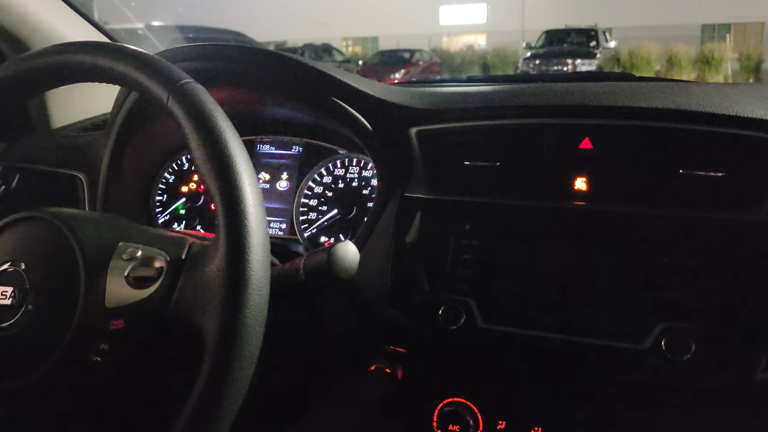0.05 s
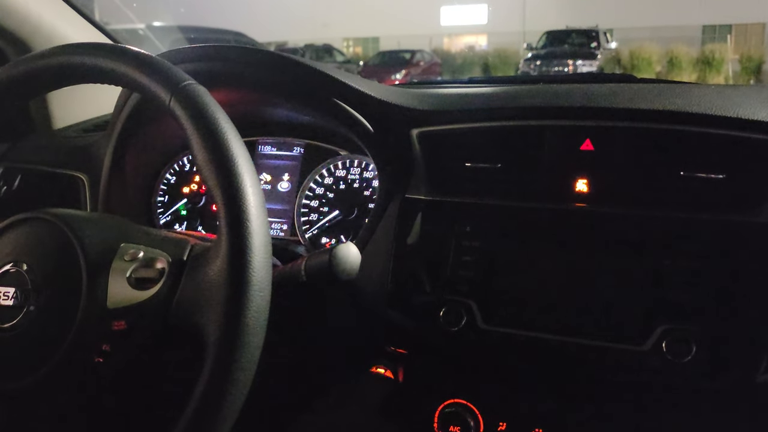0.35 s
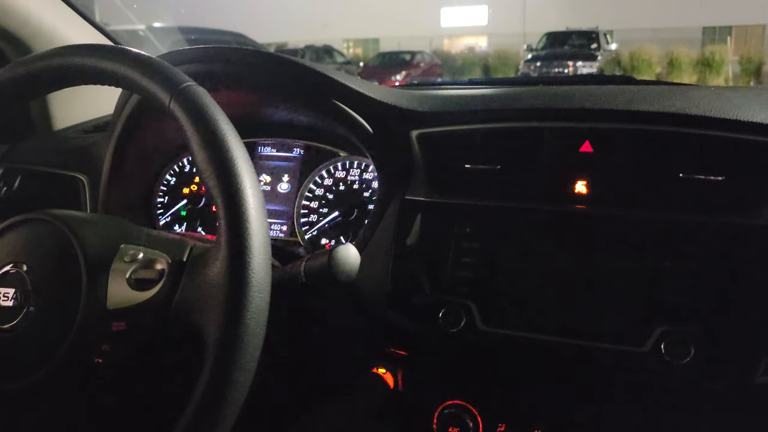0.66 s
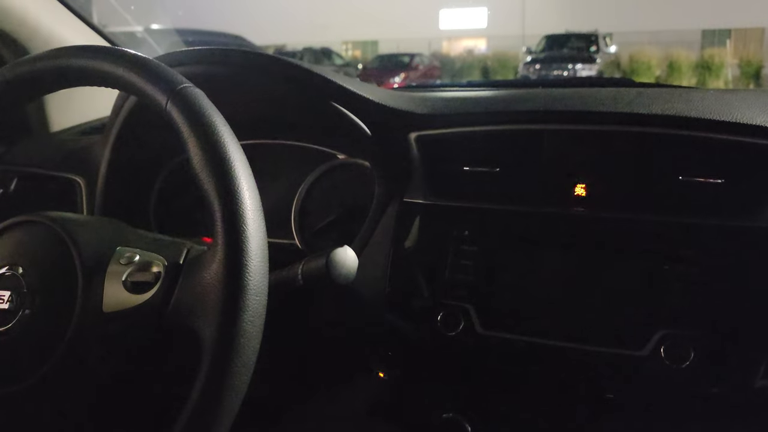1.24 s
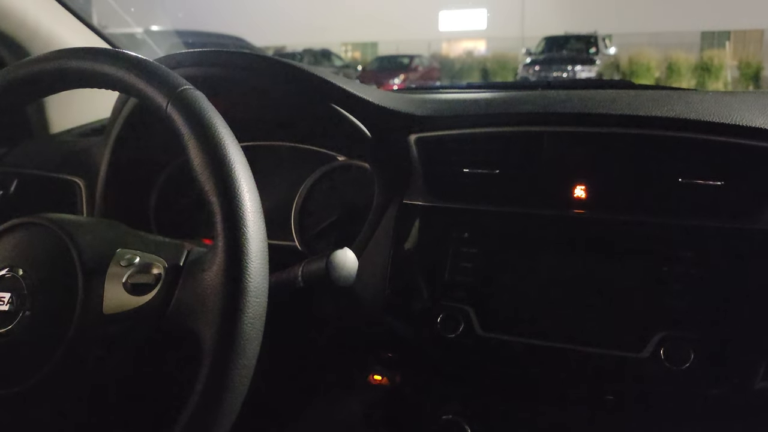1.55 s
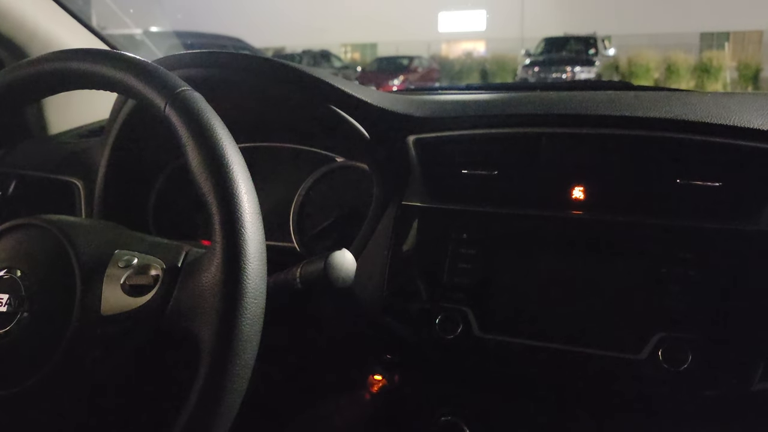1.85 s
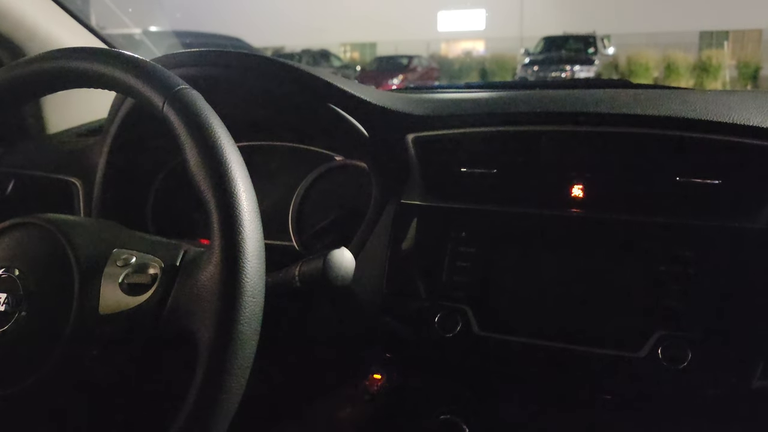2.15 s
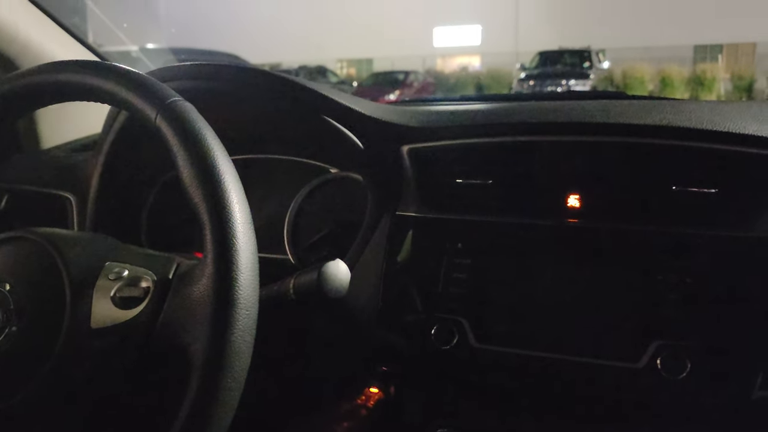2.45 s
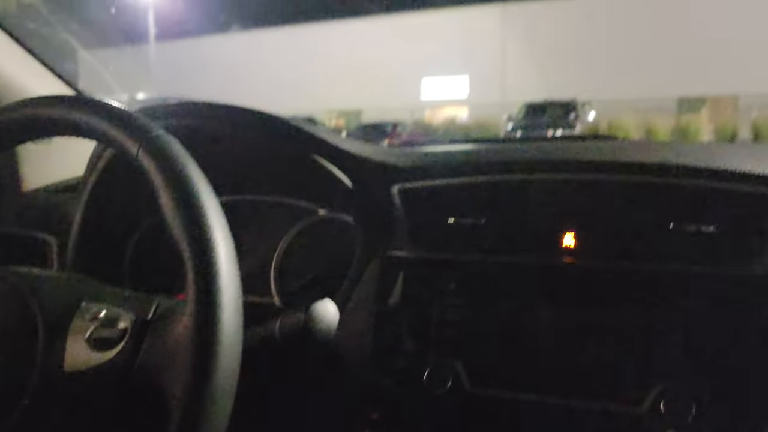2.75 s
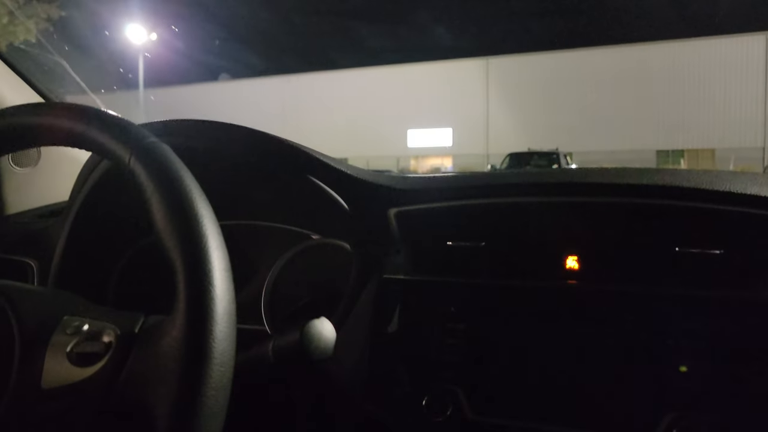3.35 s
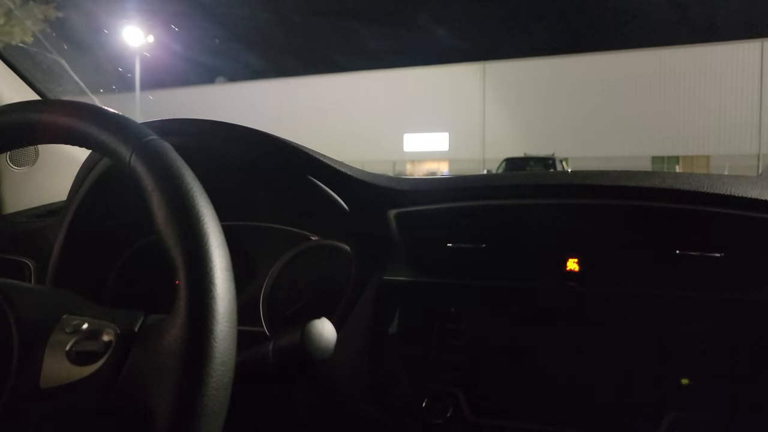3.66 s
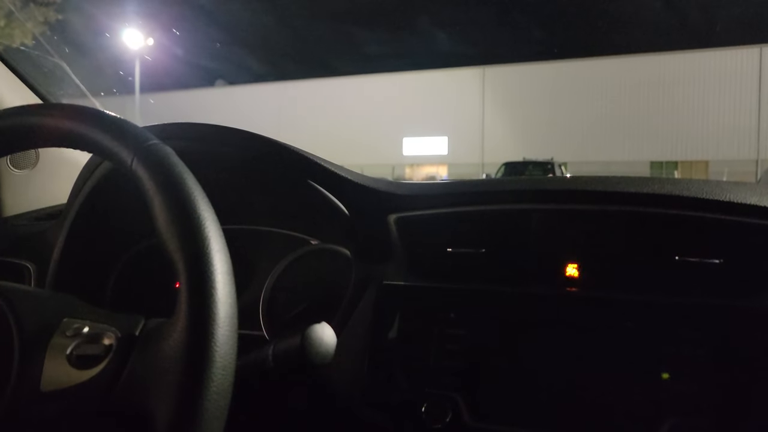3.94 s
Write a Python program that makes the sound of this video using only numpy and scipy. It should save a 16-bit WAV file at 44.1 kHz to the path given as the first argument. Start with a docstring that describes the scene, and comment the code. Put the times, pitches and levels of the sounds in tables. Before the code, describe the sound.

A car starter chatters with rapid metallic clicks but never cranks. After a dull cabin thump come three tries, the middle one very brief, with small plastic ticks between, heard from the driver's seat over low outdoor rumble.

```python
"""A dull thump in a car's cabin, then a weak battery fails to crank, heard from the driver's seat.
Three times the starter relay clicks and the solenoid chatters, slamming in and dropping out about
17 times a second; each contact rings its metal. Small plastic ticks and dry taps fall between
the tries, over a low outdoor rumble."""
import sys
import numpy as np
from scipy import signal
from scipy.fft import rfft, irfft, next_fast_len
from scipy.io import wavfile
from scipy.ndimage import map_coordinates

SR = 44100
rng = np.random.default_rng(int(sys.argv[2]) if len(sys.argv) > 2 else 0)


def transcribe(u):
    """Save the signal u as a 16-bit wav file named by the first command-line argument.

    u: samples, shape (n,) or (channels, n), limited to [-1, 1]; the rate is SR.
    q: integer samples, one column per channel.
    """
    v = np.clip(np.atleast_2d(u).T, -1, 1)
    q = np.round(v * 32767).astype(np.int16)
    wavfile.write(sys.argv[1], SR, q)


N = 176400
T = np.arange(SR // 3) / SR  # time within one blow [s]


def amp(db):
    """Decibels to gain."""
    return 10 ** (np.asarray(db) / 20)

def unit(x):
    """Scale to rms 1."""
    return x / np.sqrt(np.mean(x ** 2) + 1e-20)

def blow_unit(x):
    """Scale a blow to the energy of 10 ms at rms 1."""
    return unit(x) * np.sqrt(.01 / T[-1])

def along(points, hz):
    """Interpolate (Hz, value) points on a log axis."""
    freqs, values = np.transpose(points)
    return np.interp(np.log(hz + 1), np.log(freqs + 1), values)

def curve(rows):
    """Interpolate (s, value) points per sample."""
    return np.interp(np.arange(N) / SR, *np.transpose(rows))

def wobble(rate_hz):
    """Smooth random curve."""
    knots = rng.standard_normal(int(N * rate_hz / SR) + 4)
    return map_coordinates(knots, [np.arange(N) * rate_hz / SR])

def filtered(x, response):
    """Apply the gain response(hz)."""
    n = x.shape[-1]
    padded = next_fast_len(n + 8192)
    return irfft(rfft(x, padded) * response(np.fft.rfftfreq(padded, 1 / SR)), padded)[..., :n]

def add(out, s, x):
    """Mix x into out from time s."""
    i = min(max(round(s * SR), 0), N)
    out[:, i:i + x.shape[-1]] += x[..., :N - i]

# cabin stereo width (frequency [Hz], side over mid [dB])
CABIN_WIDTH = [(60, -11.5), (150, -12.5), (230, -8), (380, 3), (700, 3), (1200, 6), (2300, 1), (8000, 0.5)]

def noise(colour, size):
    """Coloured stereo noise with the cabin's width."""
    def response(hz):
        side = amp(along(CABIN_WIDTH, hz))
        return amp(along(colour, hz)) * np.array([np.ones_like(side), side]) / np.hypot(1, side)
    mid, side = filtered(rng.standard_normal((2, size)), response)
    return unit(np.array([mid + side, mid - side]))

def ring(colour, t60s, attack_s):
    """A struck part's dense modes, decaying per band by (Hz, t60 s) points."""
    hz, t, bands = signal.stft(noise(colour, len(T)), SR, nperseg=256)
    t60 = along(t60s, hz)[:, None]
    x = signal.istft(bands * amp(-60 * t / t60) / np.sqrt(t60), SR, nperseg=256)[1][:, :len(T)]
    return blow_unit(x * (1 - np.exp(-T / attack_s)))

def modes(table, attack_s, spread_rad):
    """Clear decaying modes, each with its own phase per channel."""
    x = sum(amp(db - 60 * T / t60) * np.sin(2 * np.pi * hz * T + spread_rad * rng.normal(size=(2, 1)))
            for hz, db, t60 in table)
    return blow_unit(x * (1 - np.exp(-T / attack_s)))


# solenoid strokes (time [s])
STROKE_TIMES = [.831, 0.8828, 0.9381, .995, 1.0512, 1.1063, 1.1635, 1.2202, 1.2783, 1.3357, 1.3924, 1.4492,
                2.2624, 2.3186, 3.5374, 3.5953, 3.6517, 3.7074, 3.767, 3.8234, 3.8821, 3.9403, 3.998]
STARTS_TRY = np.diff(STROKE_TIMES, prepend=0) > .2  # after a pause over 0.2 s
# engine bay balance (frequency [Hz], left over right [dB])
ENGINE_BALANCE = [(200, -3), (700, 2.5), (1300, -0.5), (2400, -2.5), (4400, -5.5), (8000, 2.5),
                  (15000, -1.5)]

def solenoid():
    """On a weak battery each stroke pulls, slams, bounces and drops out."""
    out = clang() + housing() + plunger() + stroke_resonance() + fall_back()
    return filtered(out, lambda hz: amp(along(ENGINE_BALANCE, hz) * np.array([[.5], [-.5]])))

# steel modes (frequency [Hz], level [dB])
STEEL_MODES = [(4250, 9), (4460, 8.5), (4640, 0.5), (4870, 2), (5010, -6.5), (5160, -7), (5330, -8),
               (5500, -7), (5850, 3), (6060, 3)]
# contacts on the steel (delay [s], level [dB], pitch [ratio])
STEEL_HITS = [(-.001, -49, 1.075), (.006, -49, 1.0), (.011, -49.5, .975), (.022, -54.5, 1.02),
              (.048, -59.5, .97)]

def clang(t60_s=.052, relative_width=.06, scatter_db=5):
    """The slam rings the upper steel modes; as the plunger seats, the ring moves to the lower ones."""
    out = np.zeros((2, N))
    hz, mode_db = np.transpose(STEEL_MODES)
    waves = np.exp(2j * np.pi * hz[:, None] * T) * amp(-60 * T / t60_s) * (1 - np.exp(-T / .0012))
    for delay, hit_db, ratio in STEEL_HITS:
        mean_phases = rng.uniform(0, 2 * np.pi, (2, len(hz)))
        for s, first in zip(STROKE_TIMES, STARTS_TRY):
            pitch_hz = 6000 if first else 4880 - 60 * s  # sags with the battery
            band = 1 / (1 + (np.log(hz / (pitch_hz * ratio)) / relative_width) ** 2) ** 2
            gains = band * amp(mode_db + scatter_db * rng.normal(size=len(hz)))
            phases = mean_phases + .48 * rng.normal(size=mean_phases.shape)
            hit = ((gains * np.exp(1j * phases)) @ waves).imag
            add(out, s + delay, amp(hit_db) * blow_unit(hit))
    return out

# slam, bounce, drop-out, return (delay [s], level [dB], attack [s])
STROKE_CONTACTS = [(0, -41, 0.0031), (.009, -43, .002), (0.0223, -45.5, 0.003), (.033, -57.5, 0.0035)]
# housing spectrum (frequency [Hz], level [dB])
HOUSING_COLOUR = [(150, -31), (260, -6.5), (420, -7), (510, 0.5), (650, -7), (760, -0.5), (930, -15),
                  (1030, -3.5), (1450, -7.5), (1850, -3), (2620, -0.5), (3830, -4.5), (4790, -1.5),
                  (5900, -3.5), (6400, -6.5), (7100, -4), (7800, -7), (8400, -14.5), (10000, -14),
                  (11600, -12.5), (12500, -10), (13600, -16), (15500, -17.5)]
# housing decay (frequency [Hz], t60 [s])
HOUSING_DECAY = [(300, 0.28), (2500, 0.15), (5000, 0.08), (10000, 0.044), (15000, 0.1)]

def housing(varied_share=.28, scatter_db=1.7):
    """Four contacts a stroke ring the same housing, almost alike each time."""
    out = np.zeros((2, N))
    variants = [ring(HOUSING_COLOUR, HOUSING_DECAY, attack_s=.0033) for _ in range(7)]
    for delay, db, attack_s in STROKE_CONTACTS:
        common = np.sqrt(1 - varied_share) * ring(HOUSING_COLOUR, HOUSING_DECAY, attack_s)
        for s in STROKE_TIMES:
            late_s = delay * (1 + .05 * rng.normal())
            gain = amp(db + scatter_db * rng.normal())
            varied = np.sqrt(varied_share) * variants[rng.integers(len(variants))]
            add(out, s + late_s, gain * (common + varied))
    return out

# pull-in spectrum (frequency [Hz], level [dB])
PULL_COLOUR = [(60, -20), (110, 16), (200, -13), (330, 5.5), (520, -13.5), (800, -2), (1300, -7), (2500, 4),
               (6000, -11.5), (15000, -22)]
# plunger modes (frequency [Hz], level [dB], t60 [s])
PLUNGER_MODES = [(506.3, -4.5, 0.49), (752, -5.5, 0.29), (1926, -5.5, 0.24), (2470, -1, 0.13),
                 (2700, 5, 0.13), (2980, -6, 0.22)]

def plunger(lead_s=.0074, pull_db=-46, ring_db=-47.5):
    """The plunger is pulled in, then rings at the slam."""
    out = np.zeros((2, N))
    pull = ring(PULL_COLOUR, [(200, .81), (3000, .056)], attack_s=.0048)
    ringing = modes(PLUNGER_MODES, attack_s=.00059, spread_rad=.93)
    for s in STROKE_TIMES:
        add(out, s - lead_s, amp(pull_db) * pull)
        add(out, s, amp(ring_db) * ringing)
    return out

# first-stroke spectrum (frequency [Hz], level [dB])
LONG_TRAVEL_COLOUR = [(1500, -18), (2000, -1.5), (2300, -5), (2600, 3), (3000, -15), (3700, -30.5)]
# hollow resonance (frequency [Hz], level [dB])
HOLLOW_COLOUR = [(1150, -52), (1330, -8), (1490, 0), (1590, 10), (1700, -8), (1900, -36)]
# its answers to slam and drop-out (delay [s], level [dB])
HOLLOW_ANSWERS = [(-.001, -48), (0.022, -48.5)]

def stroke_resonance(first_db=-43.5):
    """A try's first stroke travels farther and has its own ring; the later ones ring hollow."""
    out = np.zeros((2, N))
    hollow = blow_unit(ring(HOLLOW_COLOUR, [(1500, .096)], attack_s=.003)[0])
    antiphase = np.array([hollow, -hollow])
    for s, first in zip(STROKE_TIMES, STARTS_TRY):
        if first:
            add(out, s, amp(first_db) * ring(LONG_TRAVEL_COLOUR, [(2500, .15)], attack_s=.005))
        else:
            for delay, db in HOLLOW_ANSWERS:
                add(out, s + delay, amp(db) * antiphase)
    return out

# plunger landings (time [s], level [dB])
LANDINGS = [(1.487, -46), (1.497, -51), (2.353, -46.5), (2.364, -52)]

def fall_back(knock_db=-1):
    """The plunger falls back to rest with a knock and a short ring of the housing."""
    out = np.zeros((2, N))
    for s, db in LANDINGS:
        knock = ring(MOUNT_COLOUR, [(400, .078)], attack_s=.0028)
        metal = ring(HOUSING_COLOUR, [(400, .22), (3000, .045), (12000, .055)], attack_s=.0011)
        add(out, s, amp(db) * (amp(knock_db) * knock + metal))
    return out

# relay closures (time [s], level [dB])
CLOSURES = [(0.7688, -43.5), (2.1955, -44), (3.4737, -44)]
# case spectrum (frequency [Hz], level [dB])
CASE_COLOUR = [(900, -2.5), (1500, -7), (2800, 0.5), (7000, -6.5), (8400, -21), (15500, -10)]
# case decay (frequency [Hz], t60 [s])
CASE_DECAY = [(1000, 0.07), (2800, 0.14), (5000, 0.077), (8000, 0.038), (15000, 0.055)]
# mounting spectrum (frequency [Hz], level [dB])
MOUNT_COLOUR = [(100, -18), (250, -7), (350, -4.5), (470, 5.5), (620, -3), (800, -5), (1200, -20),
                (3000, -43)]
# armature modes (frequency [Hz], level [dB], t60 [s])
ARMATURE_MODES = [(2790, -2.5, 0.14), (3330, 3, 0.089), (4124, -2, 0.053), (5314, 4.5, 0.025),
                  (6180, 0.5, 0.032)]

def relay(armature_db=-2, mount_db=3, mount_delay_s=.00563):
    """A sharp click of case and armature, then the hollow answer of the mounting."""
    out = np.zeros((2, N))
    case = ring(CASE_COLOUR, CASE_DECAY, attack_s=.0023)
    mount = ring(MOUNT_COLOUR, [(400, .22)], attack_s=.0018)
    armature = modes(ARMATURE_MODES, attack_s=.00041, spread_rad=1)
    for s, db in CLOSURES:
        add(out, s, amp(db) * (case + amp(armature_db) * armature))
        add(out, s + mount_delay_s, amp(db + mount_db) * mount)
    return out * amp([[-1], [1]])

# knocks on the trim (time [s], level [dB])
TRIM_KNOCKS = [(0.029, -46.5), (.079, -37.5), (0.0859, -23.5)]
# trim modes (frequency [Hz], level [dB], t60 [s])
TRIM_MODES = [(60.4, -8.5, 0.27), (86, -13.5, 0.35), (147.3, -16.5, 0.4), (177, 0.5, 0.13),
              (253.6, -6, 0.093), (336.5, -11.5, 0.21), (407, -12, 0.18), (458, -9.5, 0.13),
              (633, -16, 0.075), (806, -6.5, 0.047)]
# clack spectrum (frequency [Hz], level [dB])
CLACK_COLOUR = [(200, 1.5), (450, 0), (560, -5), (700, -3), (810, 4), (930, -2.5), (1080, -3.5),
                (1400, -23), (2500, -28), (5000, -32.5), (8000, -48), (15000, -69)]

def thumps(clack_db=-2, clack_lead_s=.00302, push_hz=201.5, push_s=.0075, push_db=2):
    """A clack, a short heavy push and the boom of the trim."""
    out = np.zeros((2, N))
    push = amp(push_db) * np.sin(2 * np.pi * push_hz * T) * np.exp(-(T / push_s - 1) ** 2)
    for s, db in TRIM_KNOCKS:
        boom = modes(TRIM_MODES, attack_s=.0027, spread_rad=.68)
        clack = ring(CLACK_COLOUR, [(400, .27), (800, .087), (5000, .061)], attack_s=.00092)
        add(out, s, amp(db) * (boom + push))
        add(out, s - clack_lead_s, amp(db + clack_db) * clack)
    return out

# plastic ticks (time [s], body [dB], snap [dB], left over right [dB])
PLASTIC_TICKS = [(0.6521, -45, -59.5, 2.5), (1.857, -56.5, -95, 4), (1.916, -47, -62.5, 1),
                 (2.862, -62, -60, -6.5), (2.978, -52, -64.5, -2), (3.209, -48, -63, -0.5)]
# body spectrum (frequency [Hz], level [dB])
BODY_COLOUR = [(150, -14), (500, 2), (800, -8), (1100, 8.5), (1500, -1.5), (2200, -13), (3000, -18),
               (5000, -46), (12000, -64.5)]
# snap spectrum (frequency [Hz], level [dB])
SNAP_COLOUR = [(500, -3.5), (3000, 2), (6000, -10.5), (10000, -18.5), (15000, -19.5)]
# dash panel modes (frequency [Hz], level [dB], t60 [s])
DASH_MODES = [(860, -0.5, 0.019), (1014, -0.5, 0.042), (1504, -8, 0.044), (2890, -14, 0.05)]

def ticks(dash_db=-2.5):
    """Small plastic contacts: a short body, the dash panel's ring and a thin snap."""
    out = np.zeros((2, N))
    for s, body_db, snap_db, pan_db in PLASTIC_TICKS:
        body = ring(BODY_COLOUR, [(500, .11), (3000, .046)], attack_s=.00015)
        body += amp(dash_db) * modes(DASH_MODES, attack_s=.0003, spread_rad=.88)
        snap = ring(SNAP_COLOUR, [(2000, .036), (10000, .059)], attack_s=.00028)
        pan = amp([[pan_db / 2], [-pan_db / 2]])
        add(out, s, (amp(body_db) * body + amp(snap_db) * snap) * pan)
    return out

# dry taps (time [s], peak [dB], pitch [Hz])
DRY_TAPS = [(2.818, -32, 2410), (2.9425, -37, 746), (3.0775, -30, 920)]

def taps(decay_cycles=.29, lead_s=.005, left_db=-15, left_lag_s=.0002, answer_db=-21):
    """A cycle or two of pressure close on the right, then a faint answer from the dash."""
    out = np.zeros((2, N))
    for s, db, hz in DRY_TAPS:
        cycles = (T - lead_s - np.array([[left_lag_s], [0]])) * hz
        pulse = -np.cos(2 * np.pi * cycles) * np.exp(-abs(cycles) / decay_cycles)
        answer = ring(BODY_COLOUR, [(500, .19), (3000, .077)], attack_s=.0024)
        add(out, s - lead_s, amp([[db + left_db], [db]]) * pulse)
        add(out, s, amp(db + answer_db) * answer)
    return out

# outdoor rumble spectrum (frequency [Hz], level [dB])
RUMBLE_COLOUR = [(20, -8.5), (40, -5.5), (62, 1), (80, -17), (100, -9.5), (130, -9), (170, -17),
                 (310, -25.5), (500, -23), (800, -25), (1020, -16), (1300, -23.5), (2000, -32.5),
                 (3200, -39.5), (5000, -49), (7500, -58.5), (8300, -67), (11000, -62.5), (12000, -53),
                 (15500, -58)]
# hiss envelope (time [s], level [dB])
HISS_FADE = [(0, -58), (.15, -61), (.3, -55), (.48, -59), (.58, -75), (.8, -110)]
# hiss spectrum (frequency [Hz], level [dB])
HISS_SPECTRUM = [(300, 20), (1500, 3), (4500, -2), (9000, -21)]
# drone envelope (time [s], level [dB])
DRONE_FADE = [(0, -60), (.45, -57.5), (.65, -55), (.9, -59.5), (1.6, -82)]
# drone spectrum (frequency [Hz], level [dB])
DRONE_SPECTRUM = [(40, -60), (75, 1.5), (100, -8.5), (140, -3), (220, -16.5), (400, -24), (900, -62)]

def background(rumble_db=-52.5, hum_hz=74.8, hum_db=-57):
    """Outdoor rumble with a wavering hum; a hiss and a drone fade around the first try."""
    phase = 2 * np.pi * np.cumsum(hum_hz + 1.4 * wobble(5.9)) / SR
    hum = amp(hum_db + .96 * wobble(3.56)) * unit(np.sin(phase))
    rumble = amp(rumble_db + 2.73 * wobble(5.294)) * noise(RUMBLE_COLOUR, N)
    hiss = amp(curve(HISS_FADE)) * noise(HISS_SPECTRUM, N)
    drone = amp(curve(DRONE_FADE)) * noise(DRONE_SPECTRUM, N)
    return (rumble + hum + hiss + drone) * amp([[-.7], [.7]])

def scene():
    """Everything as heard from the driver's seat."""
    return solenoid() + relay() + thumps() + ticks() + taps() + background()

def record(dry):
    """Brick-wall low-pass at 15850 Hz."""
    return filtered(dry, lambda hz: hz < 15850)


dry = scene()
out = record(dry)
transcribe(out)
```